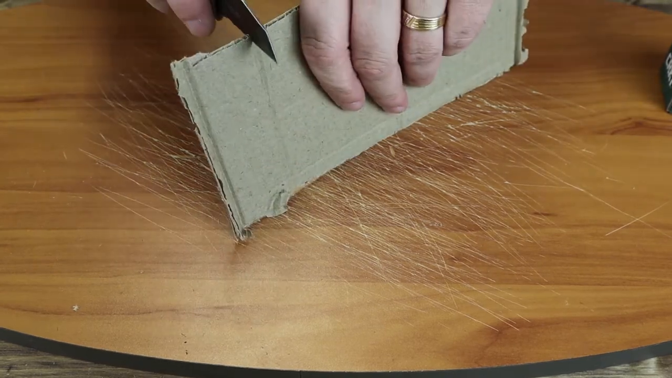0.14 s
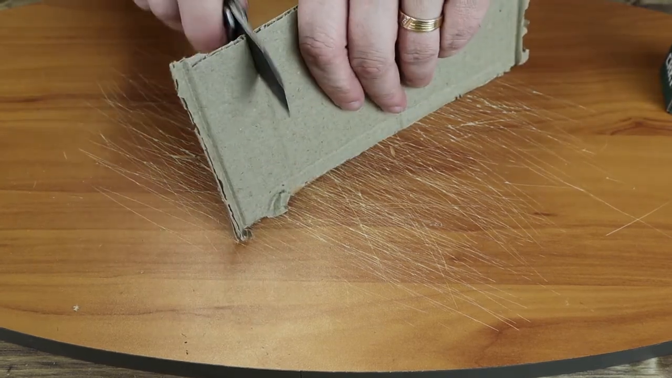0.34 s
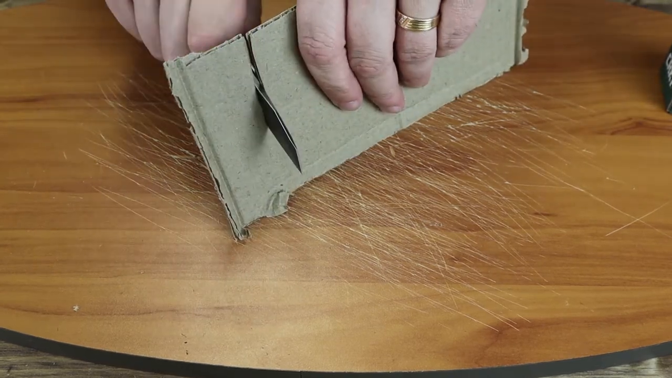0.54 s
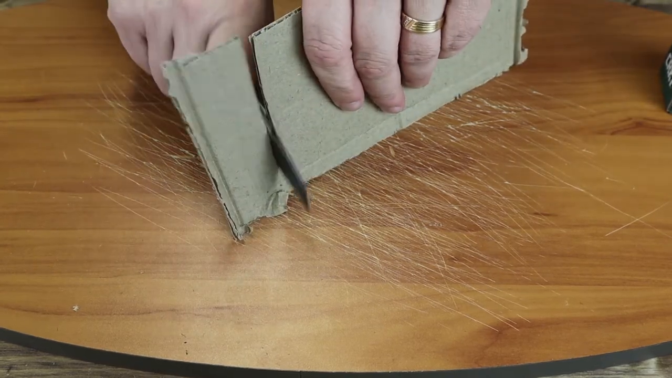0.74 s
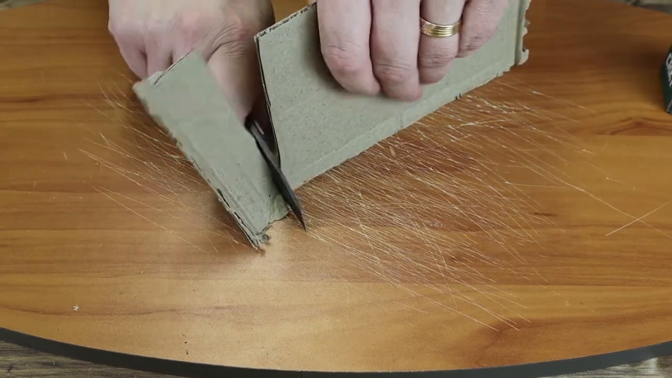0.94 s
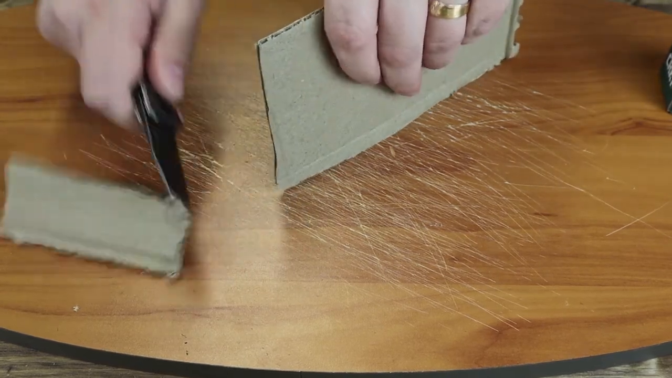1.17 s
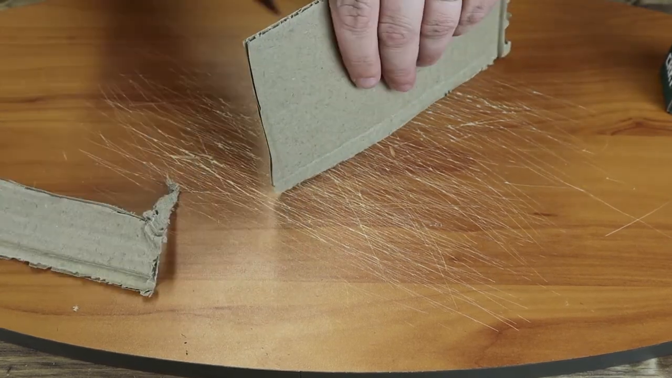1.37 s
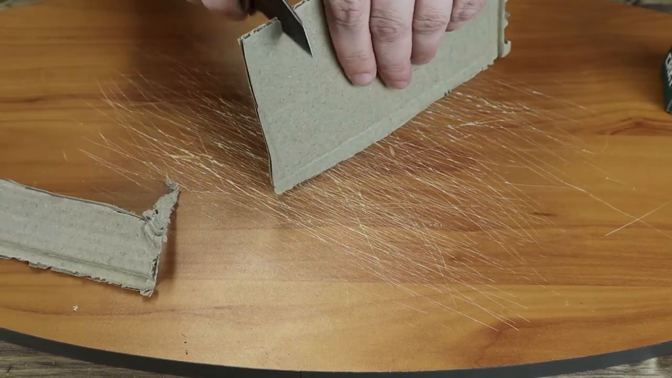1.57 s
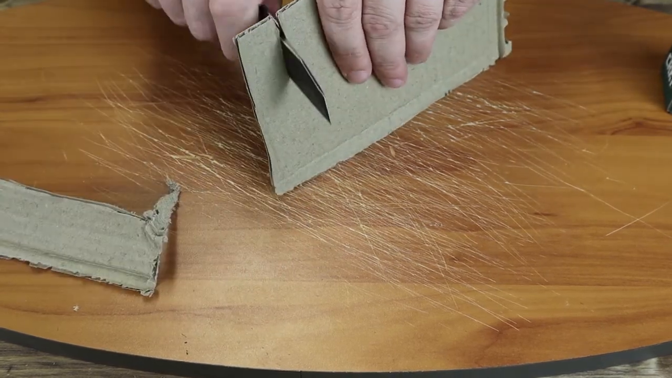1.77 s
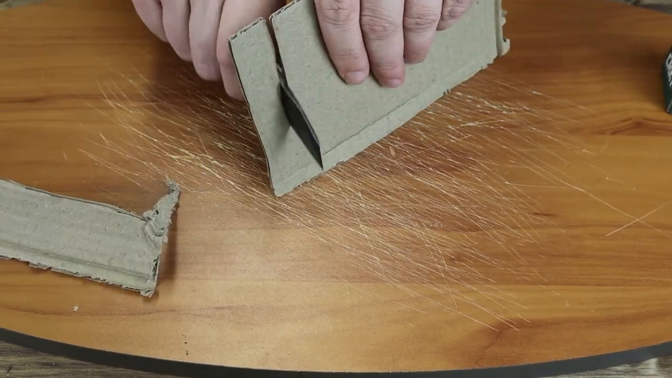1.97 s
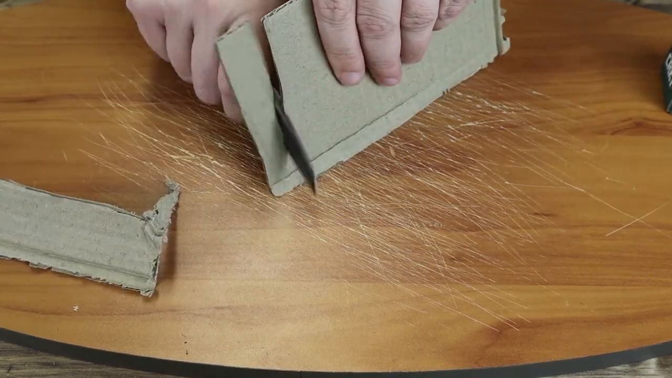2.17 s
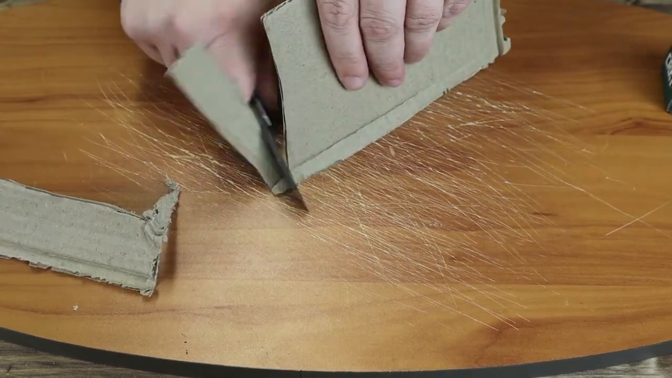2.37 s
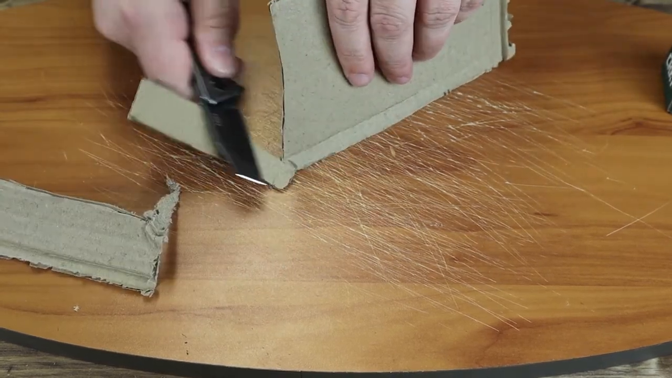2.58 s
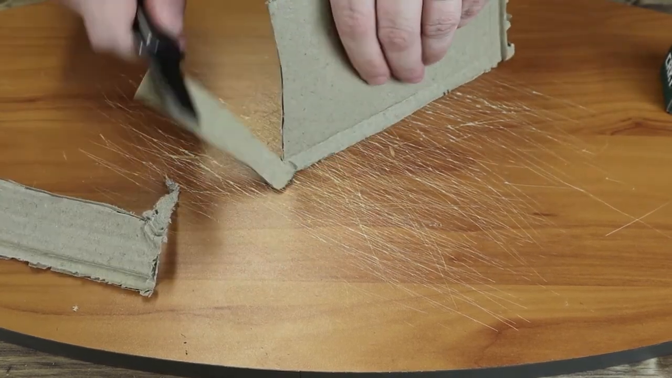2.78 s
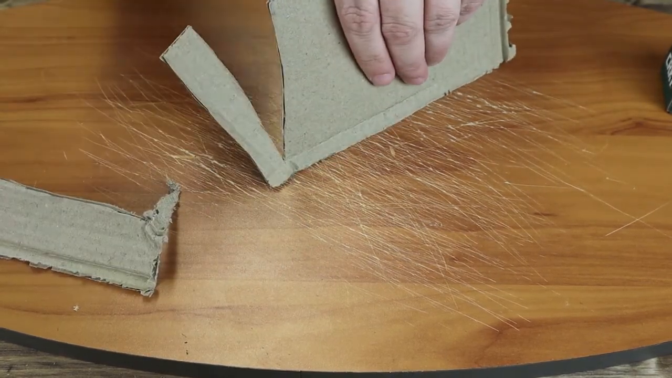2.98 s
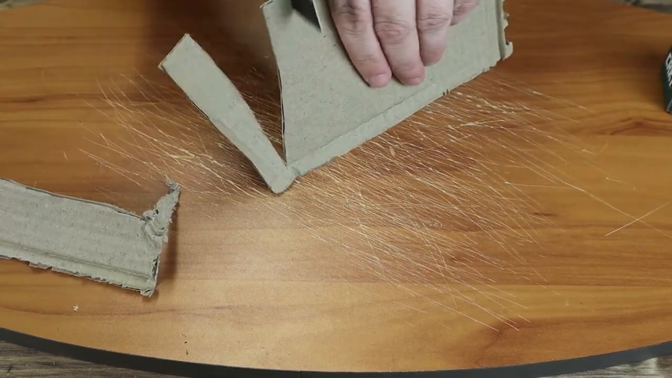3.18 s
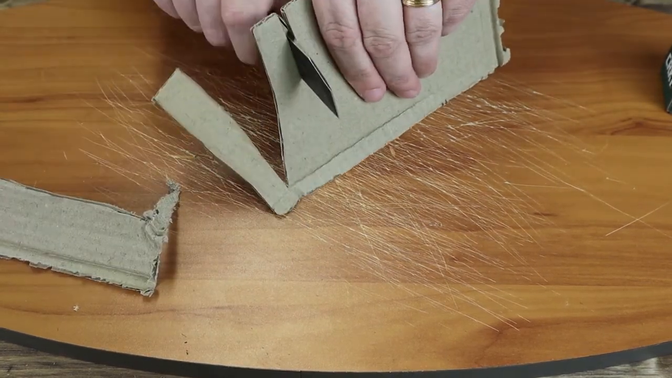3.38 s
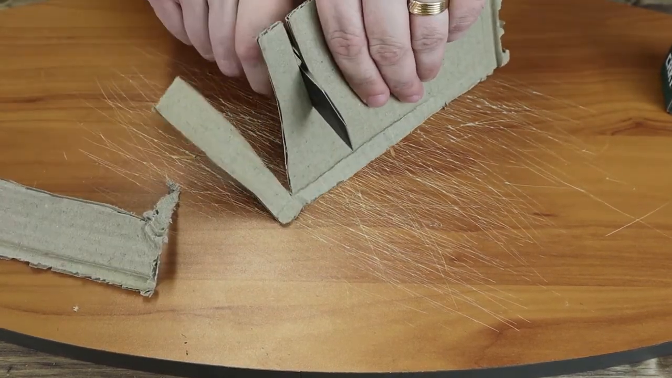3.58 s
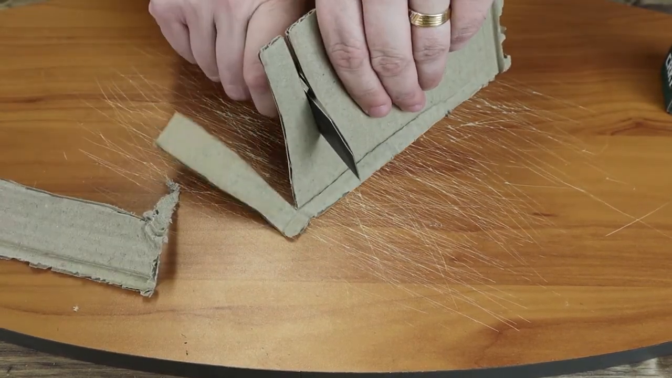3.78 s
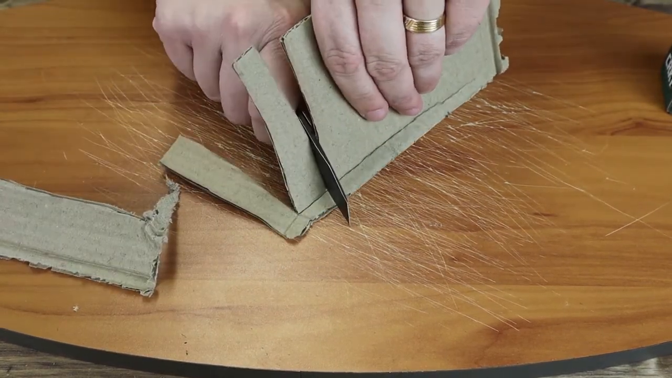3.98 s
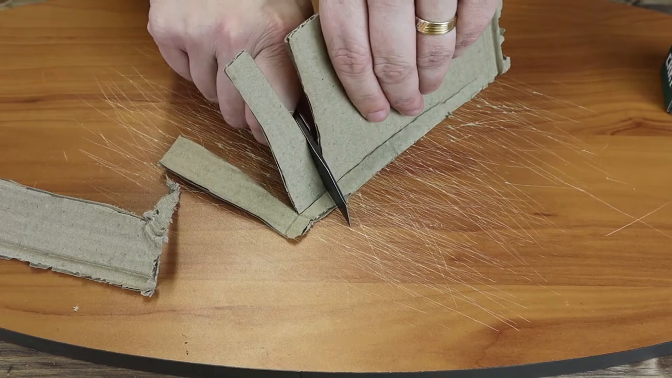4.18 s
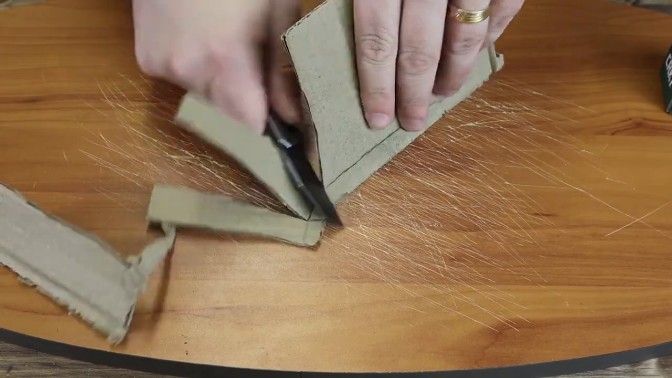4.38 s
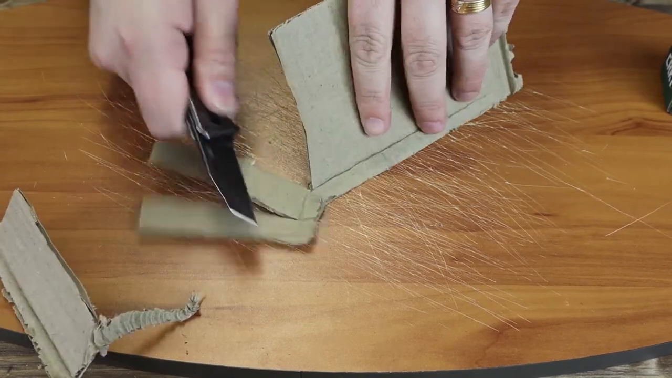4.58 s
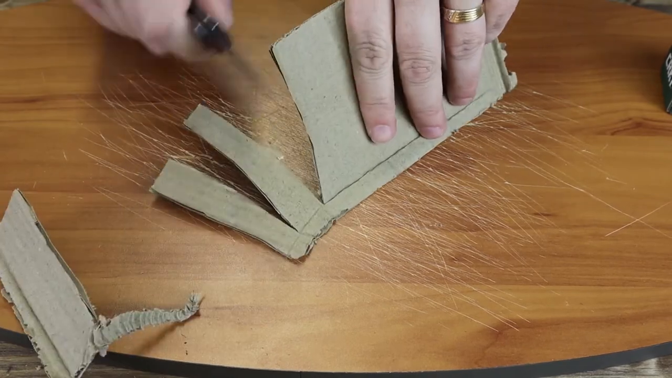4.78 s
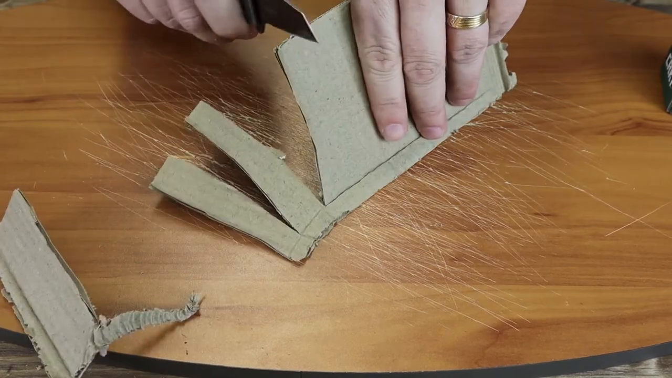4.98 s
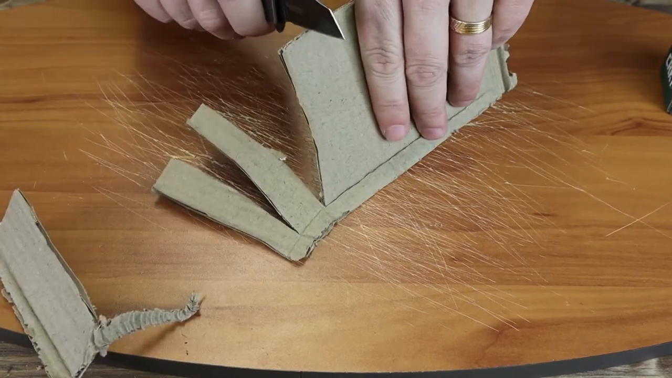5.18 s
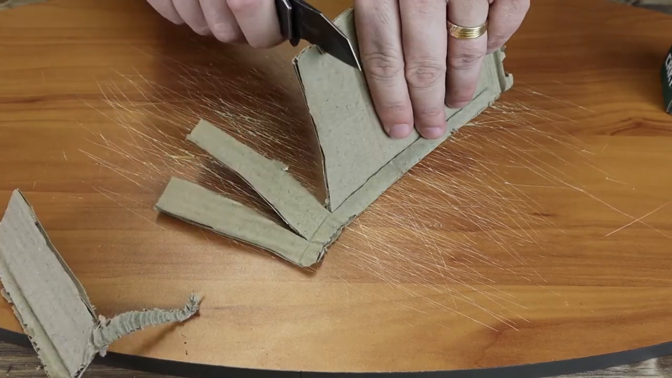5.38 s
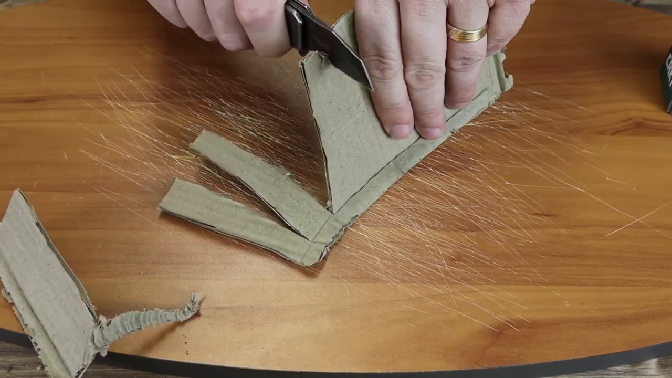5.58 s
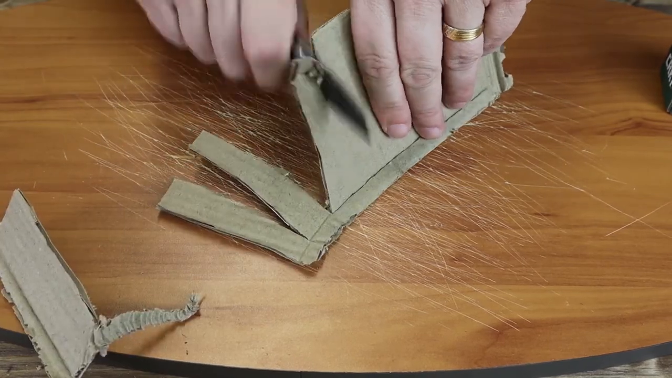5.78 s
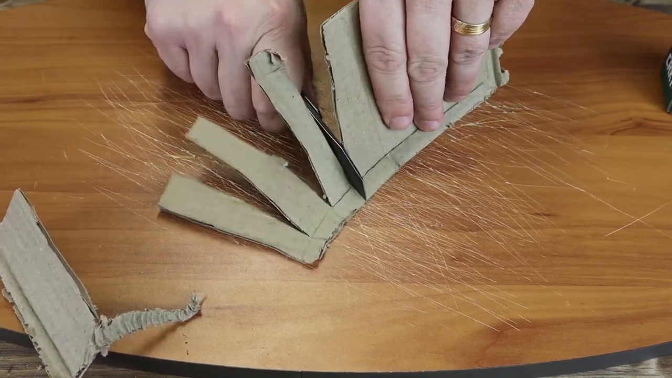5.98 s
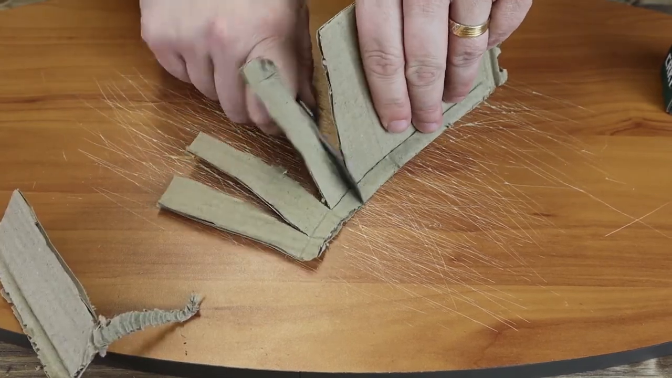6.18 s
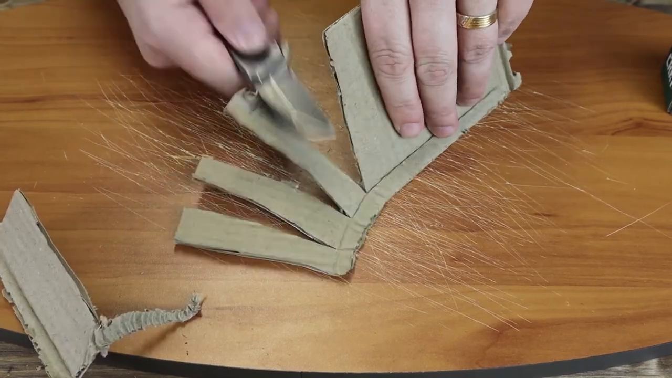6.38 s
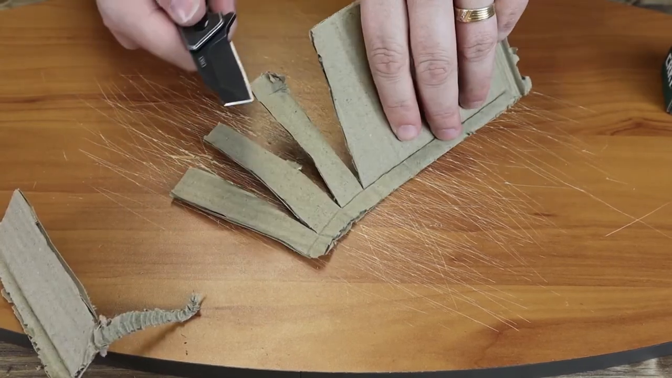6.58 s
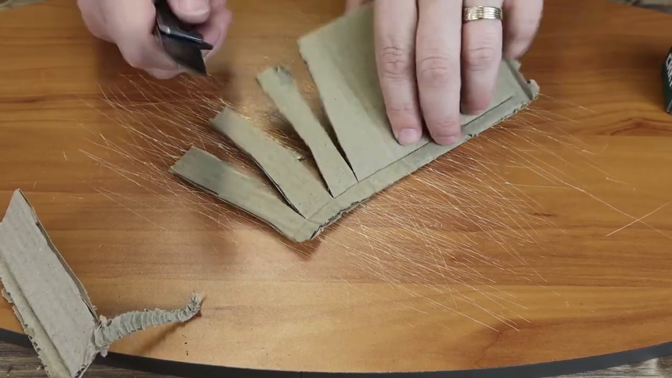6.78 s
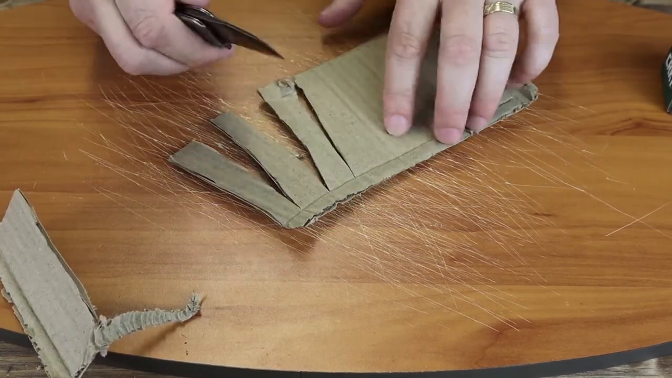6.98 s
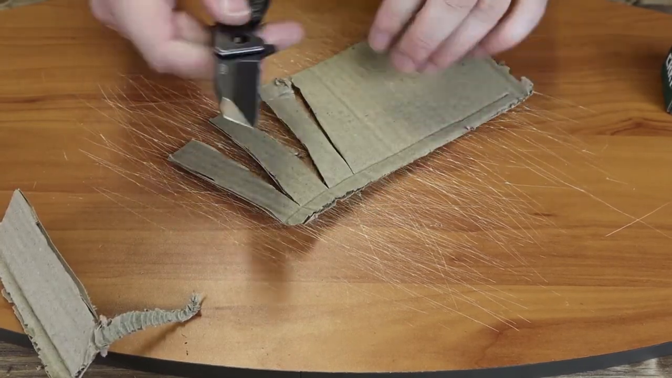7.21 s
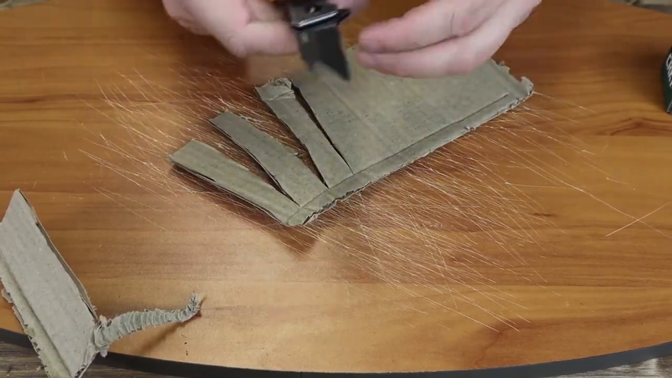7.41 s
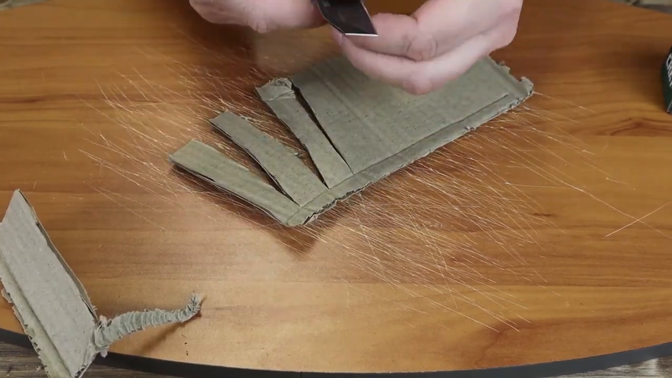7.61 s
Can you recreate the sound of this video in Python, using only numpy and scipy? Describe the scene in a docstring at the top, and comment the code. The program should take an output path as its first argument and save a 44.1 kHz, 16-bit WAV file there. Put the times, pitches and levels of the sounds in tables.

```python
"""A folding knife slices corrugated cardboard held on a wooden table, close by in a quiet room.
Fibres part in a dense crackle of noise: it hisses at the blade and drives the resonances of the sheet.
The blade catches and rips forward in sudden bursts; crackles follow the movement, and loose strips scrape.
Knocks set sheet and table ringing, a dragged edge makes the wood honk, and the pressing hand makes
the table hum. A faint room echo and a steady room tone of filtered noise lie underneath."""
import sys
import numpy as np
from scipy import signal
from scipy.fft import rfft, irfft, next_fast_len
from scipy.io import wavfile
from scipy.ndimage import uniform_filter1d, map_coordinates

SR = 44100
rng = np.random.default_rng(int(sys.argv[2]) if len(sys.argv) > 2 else 0)


def output_pcm(signal):
    """Save a mono or channel-first signal as 16-bit PCM at the path in sys.argv[1].

    Samples are clipped to [-1, 1] before scaling.
    """
    pcm = np.clip(np.atleast_2d(signal).T, -1, 1) * 32767
    wavfile.write(sys.argv[1], SR, np.round(pcm).astype(np.int16))


N = 337365  # length in samples

# Resonances of the cardboard sheet. Each row: pitch in Hz, width in Hz, relative level in dB.
SHEET_MODES = [(405.6, 105, 10), (641, 93, 1.5), (766, 80, 1.5), (962, 131, 3), (1147, 195, -1),
               (1472, 116, -1.5), (2077, 70, -4), (2660, 220, -5.5)]
# Colour of the hiss of parting fibres. Each row: frequency in Hz, relative level in dB per Hz.
FIBRE_COLOUR = [(710, -21), (1200, -5), (1860, -5), (2070, -6.5), (3180, -6), (5670, -6), (10700, -10),
                (13700, -15), (15700, -28)]
# The blade draws through the sheet, one list per cut. Each row: time in seconds, hiss level in dB,
# sheet level above the hiss in dB (before a shared boost), pitch that drives the sheet in Hz.
CUTS = [
    [(.15, -34.5, -7, 655), (.176, -47, -7, 660), (.247, -27, -10, 626), (.307, -37.5, -10, 610),
     (.447, -23.5, -8.5, 550), (.607, -32.5, 3.5, 910), (.814, -27, 3.5, 950)],
    [(1.596, -34.5, -1, 806), (1.628, -30, -2.5, 830), (1.9, -27.5, 3.5, 946), (2.079, -28.5, 5.5, 990),
     (2.099, -33, 4.5, 1060), (2.28, -24.5, -1, 1030)],
    [(3.169, -54, 2, 702), (3.205, -41.5, -6, 730), (3.213, -24.5, -3.5, 750), (3.312, -26.5, -4, 770),
     (3.388, -23, -2, 870), (3.5, -37, 3, 910), (3.58, -30, 1, 950), (3.704, -33.5, 4.5, 1030),
     (3.771, -26, 1.5, 1040), (3.84, -29, 2, 1050), (3.862, -37, 4.5, 1030), (3.951, -36, 0, 1060),
     (4.003, -32, -13, 1030)],
    [(5.278, -51, -5, 920), (5.31, -39, -8.5, 900), (5.42, -33.5, -8, 860), (5.555, -50, -1, 770),
     (5.594, -44, -6, 760), (5.605, -32, -7.5, 720), (5.655, -34, -9.5, 745), (5.719, -58.5, -9, 790),
     (5.79, -44, -10, 820)],
]
# The blade runs free through the last of a cut. Each row: start in seconds, rise in seconds, hiss level in dB,
# length in seconds, hiss level at the end in dB, sheet level above it in dB (before the boost), pitch in Hz.
RUSHES = [(0.811, 0.0068, -24.5, 0.066, -16, -5, 940), (2.256, 0.04, -12.5, 0.05, -23, -1.5, 1010),
          (3.996, 0.014, -16.5, 0.059, -17.5, -9.5, 1040), (5.789, 0.014, -19, 0.061, -34.5, -2.5, 760),
          (5.84, 0.0092, -19, 0.1, -15, -11.5, 840)]
# Strips, sheet and fingers slide about. The columns and units are those of RUSHES.
SLIDES = [(0.888, .008, -51, 0.187, -34.5, -4.5, 705), (1.139, .006, -43, 0.25, -43.5, -5, 657),
          (2.314, .006, -60, 0.086, -55, 7, 483), (2.396, 0.048, -34.5, 0.26, -34.5, -4, 810),
          (2.646, 0.013, -48.5, 0.25, -34, -7.5, 560), (2.934, 0.021, -50.5, 0.14, -51, -2, 624),
          (4.061, 0.0059, -33.5, 0.2, -63.5, -6.5, 874), (4.247, 0.022, -39.5, 0.23, -36, -7, 720),
          (4.477, 0.025, -27.5, 0.18, -30, -6.5, 780), (4.673, 0.0067, -27, 0.038, -46.5, -21, 895),
          (4.711, .009, -30, 0.11, -37.5, -4.5, 980), (4.81, .01, -56.5, 0.14, -37.5, -1.5, 970),
          (4.961, 0.0094, -33.5, 0.087, -62.5, -11.5, 950), (5.942, 0.0098, -41, 0.082, -34.5, -6, 850),
          (6.042, .01, -58, 0.093, -53.5, 5.5, 870), (6.222, 0.17, -28.5, 0.4, -48.5, -9.5, 660),
          (6.631, 0.014, -40.5, 0.065, -57, -4.5, 845), (6.702, 0.015, -43, 0.072, -49, -8, 790),
          (6.753, 0.035, -38.5, 0.19, -47, -9.5, 627), (6.951, 0.069, -44.5, 0.23, -36.5, -24.5, 797)]
RUSH_STOP_S, SLIDE_STOP_S = 0.014, 0.046  # how long a movement takes to stop, in seconds


def amp(db):
    """Turn decibels into a plain gain."""
    return 10 ** (np.asarray(db) / 20)


def unit(x):
    """Scale a sound to an average (RMS) level of 1."""
    return x / np.sqrt(np.mean(x ** 2) + 1e-20)


def along(points, hz):
    """Read a curve of (Hz, value) points, with straight lines on a log frequency axis."""
    f, v = np.transpose(points)
    return np.interp(np.log(hz + 1), np.log(f + 1), v)


def curves(rows):
    """Give one value per sample for each column after the time."""
    s, *cols = np.transpose(rows)
    return [np.interp(np.arange(N) / SR, s, c) for c in cols]


def wobble(rate):
    """A smooth random curve with this many random points a second."""
    points = rng.standard_normal(int(N * rate / SR) + 4)
    return map_coordinates(points, [np.arange(N) * rate / SR])


def filtered(x, response):
    """Shape the spectrum of a sound by a gain that depends on frequency."""
    m = next_fast_len(N + SR // 2)
    gain = response(np.fft.rfftfreq(m, 1 / SR))
    return irfft(rfft(x, m) * gain, m)[..., :N]


def coloured(x, colour):
    """Shape a sound by a table of frequencies in Hz and levels in dB."""
    return filtered(x, lambda hz: amp(along(colour, hz)))


def mode(x, hz, width):
    """Pass a sound through one resonance; a narrower one rings longer."""
    return signal.lfilter(*signal.iirpeak(hz, hz / width, SR), x)


def crackle(spread_db, lump_db):
    """Fibres parting: noise whose samples differ widely in size and come in clumps as the flutes pass."""
    clumps_db = lump_db * (wobble(45) + wobble(190))
    sizes = amp(spread_db * rng.exponential(size=N) + clumps_db)
    return unit(sizes * rng.standard_normal(N))


def patchy(x, depth_db, bands_db):
    """Short patches of the spectrum swell and sink, and narrow bands do so more slowly."""
    z = signal.stft(x, nperseg=256)[2]

    def field(tall, long):
        """Random values smoothed over frequency (tall) and over time (long)."""
        smooth = uniform_filter1d(rng.standard_normal(z.shape), size=tall, axis=0)
        return unit(uniform_filter1d(smooth, size=long, axis=1))

    gain = amp(depth_db * field(tall=5, long=12) + bands_db * field(tall=2, long=90))
    return unit(signal.istft(z * gain, nperseg=256)[1][:N])


def sheet(drive, pitch_hz, reach):
    """The cardboard rings most near the driving pitch: within reach (octaves) below, twice that above."""
    shares = []
    for hz, _, db in SHEET_MODES:
        away = np.log2(hz / pitch_hz) / np.where(hz > pitch_hz, 2 * reach, reach)
        shares.append(amp(db) * np.exp(-.5 * away ** 2))
    power = sum(s * s * w for s, (_, w, _) in zip(shares, SHEET_MODES))
    total = np.sqrt(power * np.pi / SR)  # keeps the loudness steady as the pitch moves
    return sum((-1) ** k * mode(drive * s / total, hz, w)
               for k, (s, (hz, w, _)) in enumerate(zip(shares, SHEET_MODES)))


def ringing(drive, modes, sign=-1):
    """A body answers with all its resonances; a sign near 1 lets a blow start them in step."""
    total = np.sqrt(sum(amp(2 * db) * w for _, w, db in modes) * np.pi / SR)
    return sum(sign ** k * amp(db) * mode(drive / total, hz, w) for k, (hz, w, db) in enumerate(modes))


def bursts(times, peaks_db, t60s, rise):
    """An envelope of sudden rises, each dying by 60 dB in its own time (t60, in seconds)."""
    env, t = np.zeros(N + SR), np.arange(SR // 3) / SR
    for s, db, t60 in zip(times, peaks_db, t60s):
        decay = amp(db - 60 * t / np.clip(t60, .003, .7))
        env[round(s * SR):][:len(t)] += decay * (1 - np.exp(-t / rise))
    return env[:N]


def kicked(times, peaks_db, t60s):
    """A push that opens with one sharp kick, as strong as the rattle that follows: (kick, rattle)."""
    strength = amp(peaks_db) * np.sqrt(t60s * SR / np.log(1e6))
    kick = np.bincount(np.round(times * SR).astype(int), strength, N)
    return kick, bursts(times, peaks_db, t60s, rise=.0004) * rng.choice([-1, 1], N)


def closed(rows):
    """The gain of a level curve, fading to -120 dB before and after."""
    before, after = (rows[0][0] - .002, -120), (rows[-1][0] + .01, -120)
    return amp(curves([before, *rows, after])[0])


def moves(rows, stop_s):
    """The gain of movements that rise, run from one level to another and stop."""
    rise_db, fall_db = 30.5, 34  # climb at the start and drop at the stop
    power = 0
    for s, rise, db, length, end_db, *_ in rows:
        end = s + max(length, rise + .001)
        shape = [(s, db - rise_db), (s + rise, db), (end, end_db), (end + stop_s, end_db - fall_db)]
        power = power + closed(shape) ** 2
    return np.sqrt(power)


def grip():
    """How strongly (dB above the hiss) and at what pitch (Hz) the sheet is driven, moment by moment."""
    held = [(s + part * length, db, hz)
            for s, _, _, length, _, db, hz in RUSHES + SLIDES for part in (.2, .8)]
    drawn = [(s, db, hz) for cut in CUTS for s, _, db, hz in cut]
    return curves(sorted(held + drawn))


def room_tone():
    """Steady air and microphone hiss: coloured noise whose bands gently swell and sink."""
    # Colour of the quiet room. Each row: frequency in Hz, relative level in dB per Hz.
    quiet_colour = [(20, -19.5), (43, -6.5), (111, -6.5), (200, -13.5), (264, -9), (322, -14),
                    (15000, -33.5)]
    hiss = coloured(rng.standard_normal(N), quiet_colour)
    return amp(-54.5) * patchy(hiss, depth_db=3.5, bands_db=2.7)


def room(x):
    """The room answers with a tail of noise in which each frequency dies at its own speed."""
    # How fast the echo dies. Each row: frequency in Hz, time to fall by 60 dB in seconds.
    echo_times = [(200, 0.16), (1500, 0.067), (10000, 0.019)]
    hz, t, z = signal.stft(rng.standard_normal(SR // 3), SR, nperseg=256)
    fade = amp(-60 * t / along(echo_times, hz)[:, None])
    tail = signal.istft(z * fade, SR, nperseg=256)[1]
    late = np.pad(x, (250, 0))  # the answer starts 250 samples later
    return signal.fftconvolve(late, tail / np.linalg.norm(tail))[:N]


def hum():
    """The pressing hand carries the work into the table, whose low resonances hum."""
    # Low resonances of the table. Each row: pitch in Hz, width in Hz, relative level in dB.
    table_modes = [(58.3, 13, -22), (147.7, 17.4, 1.5), (192, 21, -1.5), (223.6, 16, -2), (316, 78, -11.5)]
    # Hum under each cut. Each row: level at its start in dB, level at its end in dB, before the wobble.
    cut_hum = [(-41, -36), (-38.5, -42.5), (-42.5, -48.5), (-44, -63)]
    slide_hum_db, rest_hum_db = -8.5, -62.5  # hum above the sliding sheet, and at rest
    pressed = 0
    for cut, (first, last) in zip(CUTS, cut_hum):
        pressed = pressed + closed([(cut[0][0], first), (cut[-1][0] + 0.044, last)]) ** 2
    sliding = amp(slide_hum_db + grip()[0]) * moves(SLIDES, SLIDE_STOP_S)
    slid = uniform_filter1d(sliding ** 2, size=4000)
    level = np.sqrt(pressed + np.abs(slid) + amp(2 * rest_hum_db))  # powers add
    return ringing(level * amp(2.53 * wobble(22)) * rng.standard_normal(N), table_modes)


def drags():
    """A cardboard edge sticks and slips on the wood; a harder drag brings out more of the upper resonances."""
    # Each row: start in seconds, rise in seconds, level in dB, length in seconds, level at the end in dB.
    drag_moves = [(.18, 0.018, -39.5, 0.41, -28), (1.081, 0.02, -10.5, 0.072, -24.5),
                  (2.42, 0.0083, -41.5, 0.168, -24.5), (4.37, .014, -41.5, 0.112, -38),
                  (4.48, 0.014, -19, 0.043, -16)]
    # Resonances of the honking wood. Each row: pitch in Hz, width in Hz, relative level in dB.
    honk_modes = [(668, 44, 5), (1140, 79, -8), (1440, 46, -3), (3270, 150, -25.5), (7330, 200, -22),
                  (13220, 400, -25)]
    level = moves(drag_moves, stop_s=0.018)
    drive = level * crackle(spread_db=2.0, lump_db=1.3)
    hard = np.clip(level / amp(-23.5), 0, 1) ** 0.31  # share of the full set of resonances
    return hard * ringing(drive, honk_modes) + (1 - hard) * ringing(drive, honk_modes[:1])


def knocks():
    """A blow is a few milliseconds of push into sheet and table, with a tick at first contact."""
    # Knocks of blade and strips. Each row: time in seconds, relative sheet level in dB,
    # table level against the sheet in dB (before a shared boost), pitch of the blow in Hz.
    blow_table = [(0.143, -21, -6.5, 690), (0.878, 4, -24, 660), (0.941, -27.5, 5.5, 1480),
                  (1.095, -5, -39.5, 1000), (1.596, -28, -3, 500), (2.303, 4.5, -29.5, 660),
                  (3.169, -22.5, -10.5, 900), (4.05, -16, 5.5, 861), (4.166, -20.5, -4.5, 644),
                  (4.494, -11.5, -26.5, 764), (4.978, -26, -35, 404), (5.218, -21.5, -29.5, 900),
                  (5.223, -28.5, -25, 397), (5.802, -30.5, 8.5, 830), (5.934, -17, 10.5, 990),
                  (6.878, -20, -19, 437)]
    # The table top after a blow, with a close pair that beats. Each row: pitch in Hz, width in Hz, relative
    # level in dB (before a small step down from row to row).
    thud_modes = [(168.5, 5.8, -0.5), (193, 6.5, -3), (190, 60, -8.5), (406, 23, -4.5)]
    s, peak_db, wood_db, pitch_hz = np.transpose(blow_table)
    # each pitch takes over 4 ms ahead of its blow
    latest = np.searchsorted(s, np.arange(N) / SR + .004) - 1
    held_hz = pitch_hz[np.clip(latest, 0, None)]
    kick, rap = kicked(s, peak_db - 4.5, np.full(len(s), .015))
    blows = np.zeros(N)
    blows[np.round(s * SR).astype(int)] = amp(peak_db + wood_db + 24.5)
    soft_blows = mode(mode(blows, hz=190, width=120), hz=190, width=120)
    thud = ringing(soft_blows, thud_modes, sign=0.96)
    # the whole table rocks
    rocking = bursts(s, peak_db + np.maximum(wood_db + 1, -20), np.full(len(s), .25), rise=0.005)
    shove = mode(rocking * rng.standard_normal(N), hz=45.2, width=150)
    return amp(-7.5) * rap + sheet(kick + rap, held_hz, reach=0.19) + thud + shove


def ticks(level):
    """The envelope of creased card crackling: clear ones, and chance ones that follow the movement."""
    # The clear crackles. Each row: time in seconds, relative peak level in dB.
    clear_ticks = [(1.2121, -26.5), (1.365, -27.5), (1.4956, -32), (2.4666, -19), (3.8885, -29),
                   (4.3625, -23), (4.421, -32), (5.3206, -16.5), (5.518, -26.5), (5.5262, -27.5),
                   (5.6794, -36), (6.1083, -34), (6.13, -39), (6.2926, -33), (6.324, -21.5),
                   (6.6084, -30.5)]
    t60_s, strays_per_s = 0.015, 23  # ring of a crackle; how often chance ones come
    stray_db, stray_top_db = 14.5, -37.5  # their highest peak above the movement; louder moves add no more
    s, peak_db = np.transpose(clear_ticks)
    draw = rng.random((int(strays_per_s * N / SR), 2))
    at = (draw[:, 0] * N).astype(int)
    follow_db = 20 * np.log10(np.minimum(level[at], amp(stray_top_db)) + 1e-6)
    strays_db = follow_db + stray_db - 10 * draw[:, 1]
    places = np.r_[np.round(s * SR).astype(int), at]
    spikes = np.bincount(places, amp(np.r_[peak_db - 4, strays_db]), N)
    return signal.fftconvolve(spikes, amp(-60 * np.arange(SR // 10) / SR / t60_s))[:N]


def rips():
    """The blade catches and rips, jolting the sheet: (envelope for the hiss, crack and ring)."""
    # Each row: time in seconds, relative peak level in dB, sheet level against it in dB (before a shared
    # cut), time for the hiss to fall by 60 dB in seconds.
    rip_table = [(0.846, -24, -9, 0.028), (1.042, -19.5, -18, 0.045), (2.8892, -14.5, -30, 0.048),
                 (2.9591, -27.5, -11.5, 0.087), (3.213, -7, -13, 0.025), (3.2489, -4.5, -11, 0.042),
                 (3.7336, -18, 3, 0.069), (4.006, -3, -6.5, 0.021), (4.273, -21, -10, 0.034),
                 (4.581, -7, -37, 0.015), (4.953, -1.5, -4.5, 0.028), (5.2979, -6.5, -6.5, 0.045),
                 (5.3849, -7, -8, 0.1), (5.601, 0.5, -8, 0.034), (5.6403, -11, -8.5, 0.056),
                 (5.802, -13.5, -8, 0.058), (5.853, -9, -4.5, 0.072), (6.011, -19.5, -2.5, 0.054),
                 (6.5068, -15.5, -18, 0.031), (6.8, -19, -33, 0.029)]
    s, peak_db, body_db, t60 = np.transpose(rip_table)
    flare = bursts(s, peak_db - 10.0, t60, rise=0.00063)
    snap = bursts(s, peak_db - 4.5, t60 / 5, rise=0.000206)  # the first fibres go all at once
    crack = amp(12.0) * coloured(snap * rng.choice([-1, 1], N), FIBRE_COLOUR)
    jolt = sum(kicked(s, peak_db + body_db - 3.0, 0.79 * t60))
    low_ring = amp(9.5) * mode(jolt, *SHEET_MODES[0][:2])  # a rip always wakes the lowest resonance too
    pitch_hz = grip()[1]
    return flare, crack + sheet(jolt, pitch_hz, reach=0.26) + low_ring


def blade_hiss(sheet_db):
    """Crackling hiss of parting fibres; a touch that hardly moves the sheet only whispers."""
    # Hiss of a light touch on paper. Each row: frequency in Hz, relative level in dB per Hz.
    skim_colour = [(1000, -44.5), (2000, -15), (3000, -12.5), (4200, -9), (5600, -1), (8000, -10.5),
                   (13000, -11), (16000, -36)]
    cut, skim = [patchy(coloured(crackle(spread_db=2.5, lump_db=1.5), colour), depth_db=2.0, bands_db=2.0)
                 for colour in (FIBRE_COLOUR, skim_colour)]
    light = 1 / (1 + np.exp((sheet_db + 11) / 3))  # 1 is the lightest touch
    return np.sqrt(1 - light) * cut + np.sqrt(light) * skim


def cutting():
    """Steady rubbing and sudden rips share the hiss at the blade and the sheet's resonances."""
    drawn = sum(closed([row[:2] for row in cut]) ** 2 for cut in CUTS)
    rushed = moves(RUSHES, RUSH_STOP_S) ** 2
    slid = moves(SLIDES, SLIDE_STOP_S) ** 2
    level = np.sqrt(drawn + rushed + slid)
    sheet_db, pitch_hz = grip()
    flare, rip_sound = rips()
    blade = np.hypot(level, ticks(level) + flare)
    drive = level * amp(sheet_db + 2.5) * crackle(spread_db=2.5, lump_db=1.1)
    rub = sheet(drive, pitch_hz, reach=0.64)
    return blade * blade_hiss(sheet_db) + rub + rip_sound


def scene():
    """Add the room's answer, the table hum and the room tone to the work."""
    work = cutting() + drags() + knocks()
    return (work + amp(-18.5) * room(work) + hum() + room_tone())[None]


def record(dry):
    """The loudest peaks round off; the microphone rolls away near 16 kHz, with nothing from 16.5 kHz up."""
    soft = dry / (1 + np.abs(dry / .62) ** 6) ** (1 / 6)
    return filtered(soft, lambda hz: (hz < 16500) * amp(-28 * np.clip((hz - 15600) / 150, 0, 1)))


dry = scene()
out = record(dry)
output_pcm(out)
```